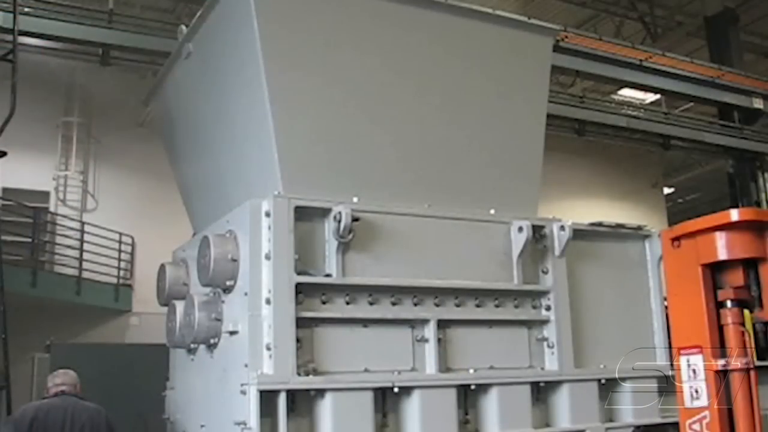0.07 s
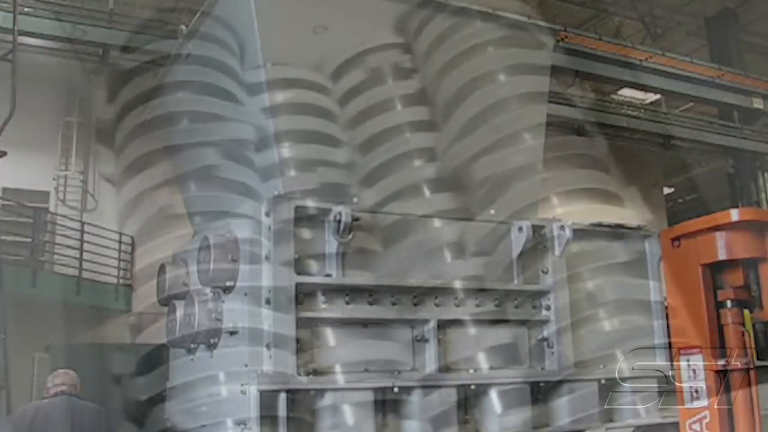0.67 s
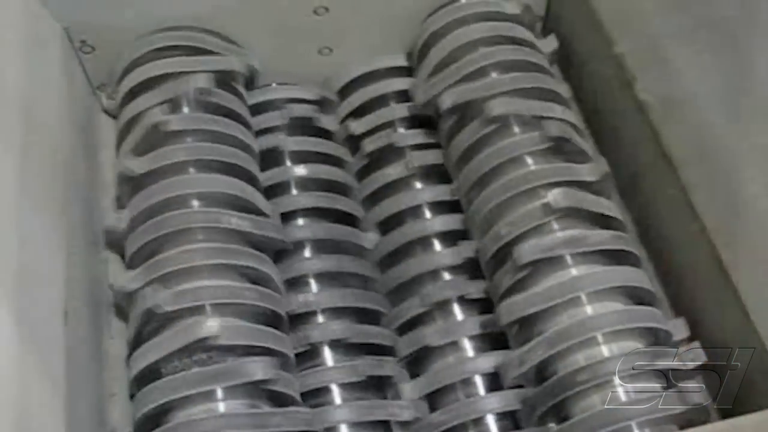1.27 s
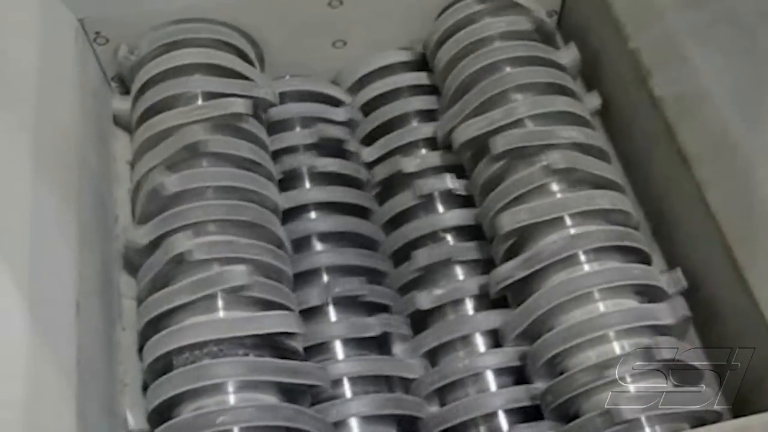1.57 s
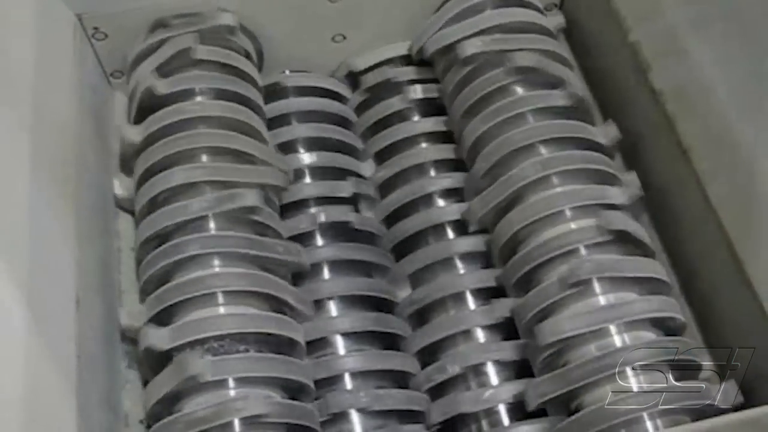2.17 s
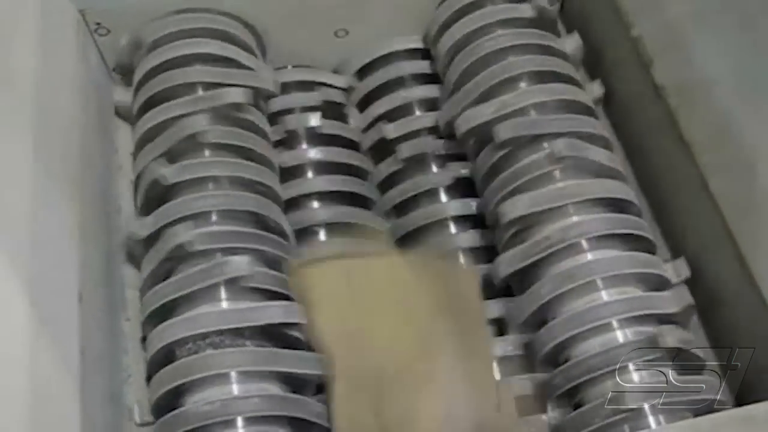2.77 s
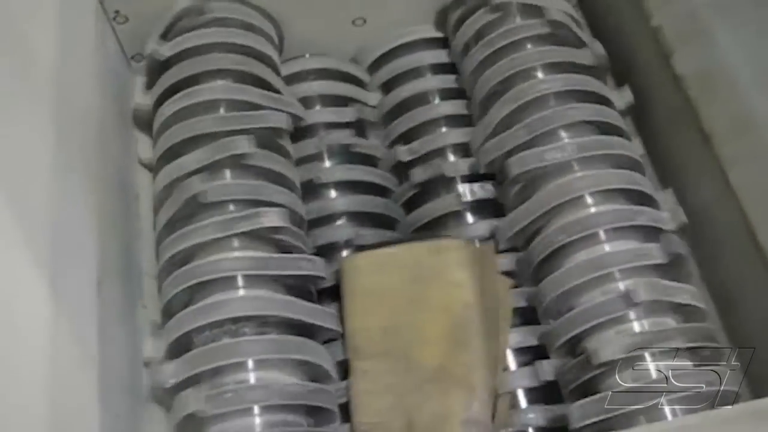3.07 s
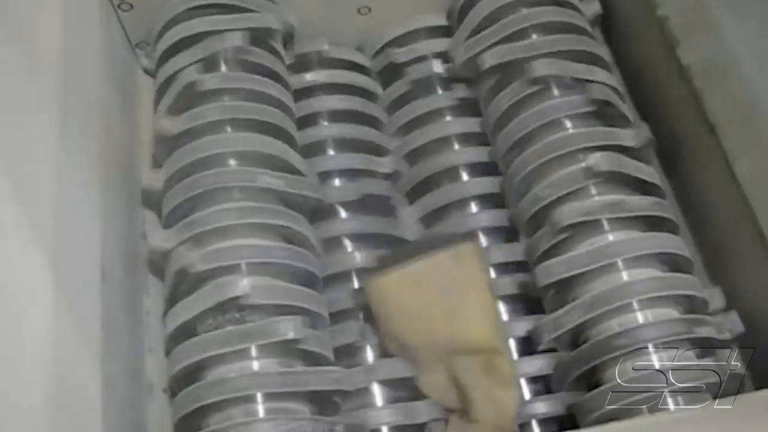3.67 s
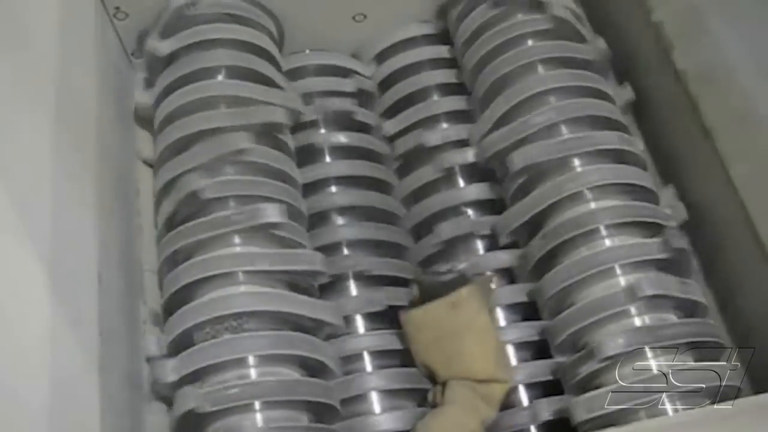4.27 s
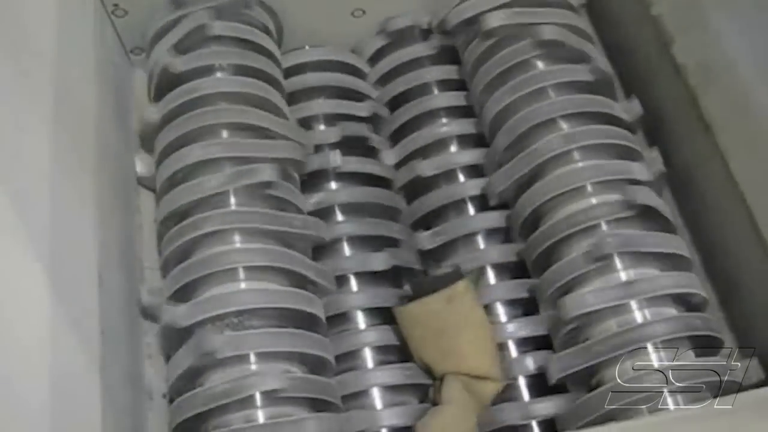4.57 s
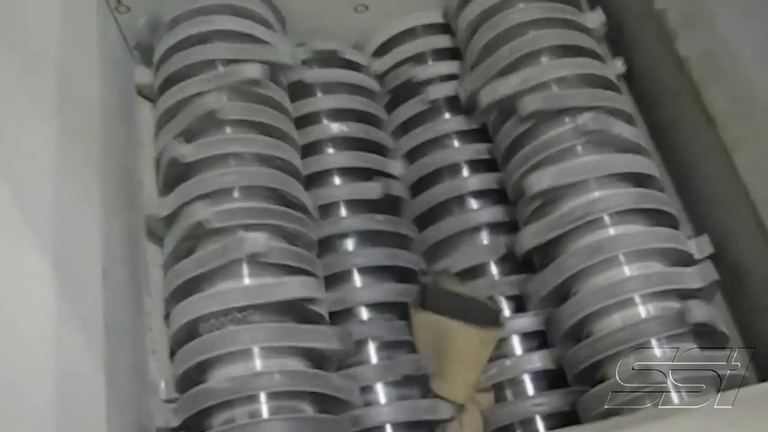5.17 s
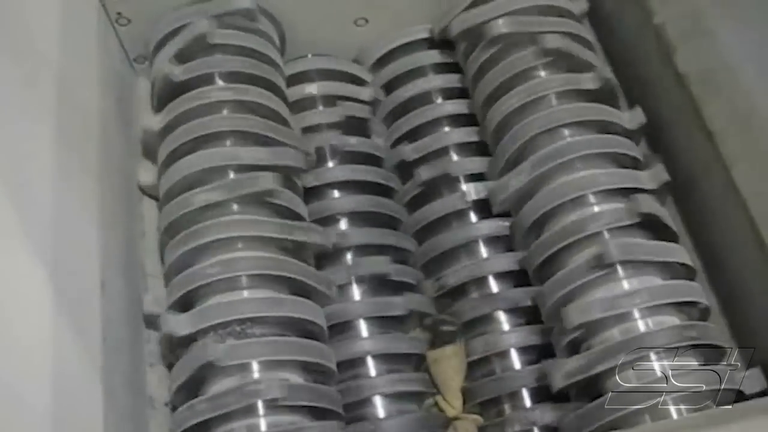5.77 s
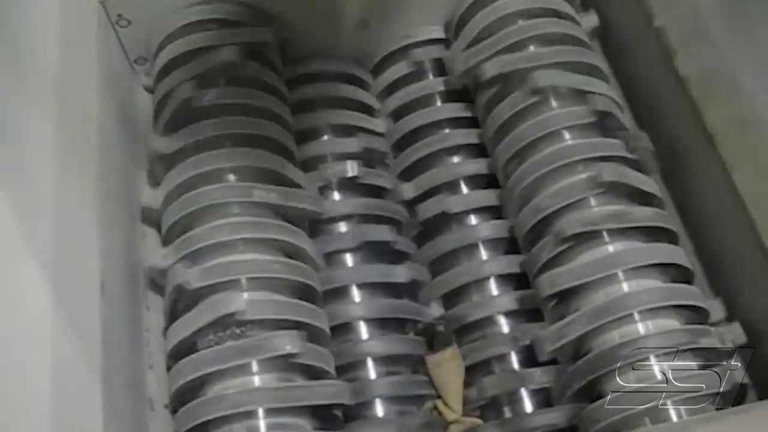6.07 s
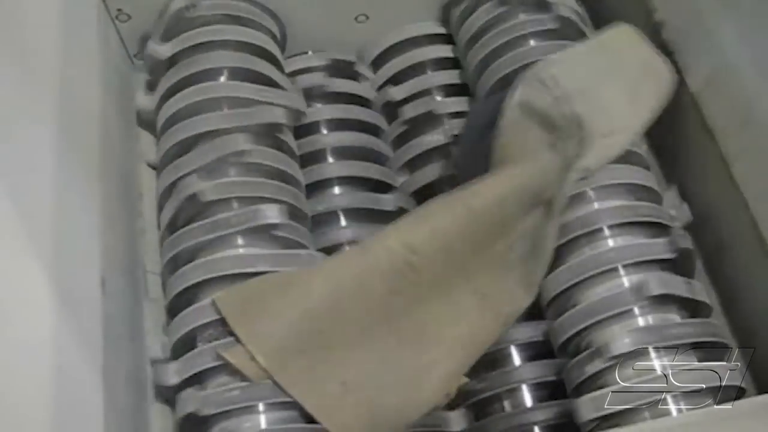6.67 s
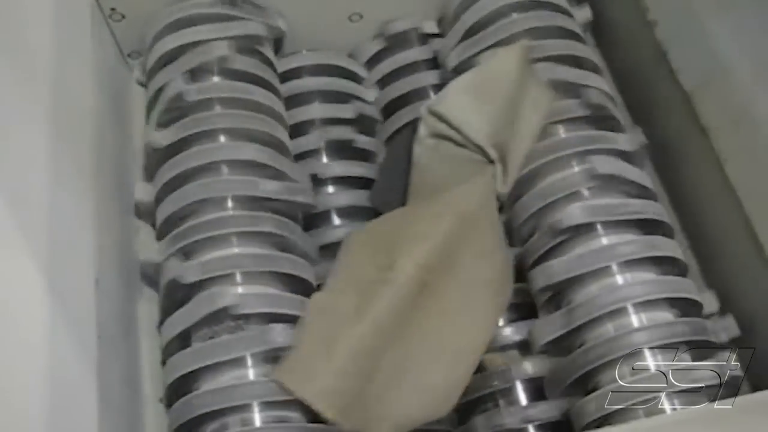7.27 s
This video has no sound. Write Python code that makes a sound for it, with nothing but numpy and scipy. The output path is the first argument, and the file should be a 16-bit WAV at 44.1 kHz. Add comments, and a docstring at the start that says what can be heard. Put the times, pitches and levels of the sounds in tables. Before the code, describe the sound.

After a brief silence, an industrial shredder fades in between about 0.7 and 1.7 seconds, heard from above its steel hopper. Its motors give a throbbing low hum, the gears whine and the cutter shafts rumble and churn throughout. At about 2.8 seconds a piece of carpet lands on the cutters with a heavy thump, the loudest moment, followed by sharp snaps and brief steel squeaks. Around 3.4 seconds there are smaller knocks and the rumble swells as the cutters bite. From then on the carpet tears in irregular crackling bursts, with short rasps and rips. The drive groans briefly several times between 4 and 6 seconds, with another soft knock at 5. The tearing grows denser from about 5 seconds and continues over the machine rumble until the end at around 7.5 seconds, with a sharp rip just before.

```python
"""Four-shaft shredder tearing carpet

Heard from above the steel hopper in a factory hall, fading in. Motors hum and gears whine
over the rumble of the cutter shafts. A piece of carpet thumps in, and the hooks tear it
in crackling bursts while the drives sing under the load."""
import sys
import numpy as np
from scipy import signal
from scipy.fft import rfft, irfft
from scipy.io import wavfile
from scipy.ndimage import uniform_filter1d

SR = 44100
rng = np.random.default_rng(int(sys.argv[2]) if len(sys.argv) > 2 else 0)


def generate_wav(sig):
    """Save sig (samples, or channels by samples) to the path in sys.argv[1] as 16-bit PCM at SR."""
    pcm = np.round(np.clip(np.atleast_2d(sig).T, -1, 1) * 32767).astype(np.int16)
    wavfile.write(sys.argv[1], SR, pcm)


N = 331632
T, HZ = np.arange(N) / SR, np.fft.rfftfreq(N, 1 / SR)
MOTOR_HZ, MESH_HZ = 30.14, 211.2
BITE_S, GRIP_S = 3.16, 0.56


def gain_of(db):
    """Decibels to amplitude."""
    return 10 ** (np.asarray(db) / 20)


def unit_rms(x):
    """Scales to rms 1."""
    return x / np.sqrt(np.mean(x ** 2) + 1e-20)


def at_hz(table, hz):
    """Interpolates a table over log frequency."""
    table_hz, value = np.transpose(table)
    return np.interp(np.log(hz + 1), np.log(table_hz + 1), value)


def drift(rate_hz, size=4096):
    """Low-passed random wander, rms about 1."""
    t = np.linspace(0, T[-1], size)
    rolloff = 1 + (np.fft.rfftfreq(size, t[1]) / rate_hz) ** 4
    slow = irfft(rfft(rng.standard_normal(size)) / rolloff)
    return np.interp(T, t, unit_rms(slow))


def burst(peak_s, db, length_s):
    """Bell envelope that falls faster than it rises."""
    width_s = length_s * np.where(T < peak_s, 1.2, .75)
    return gain_of(db) * np.exp(-2 * ((T - peak_s) / width_s) ** 2)


def loaded(idle, load):
    """Idle-to-load ramp as the hooks grip, centred on the bite."""
    return idle + (load - idle) * np.clip((T - BITE_S) / GRIP_S + .5, 0, 1)


# Shaft labour: (time [s], effort [dB])
SHAFT_EFFORT = [(1.6, -2), (2.1, 1.5), (2.75, .5), (2.9, 2), (3.05, 0), (3.28, -.5), (3.4, 5), (3.62, 1),
                (4.3, 0.5), (4.5, -1.5), (5.0, .5), (5.2, -1), (5.72, -2.5), (6.0, 0), (6.14, -0.5),
                (6.62, -2), (7.0, 0.5), (7.5, -.5)]


def effort_db():
    """How hard the shafts labour at each sample."""
    return np.interp(T, *np.transpose(SHAFT_EFFORT))


# Likeness of the ears: (frequency [Hz], correlation [0-1])
EAR_CORRELATION = [(60, 0.99), (250, .99), (500, 0.96), (1000, 0.86), (2000, 0.65), (4000, 0.077),
                   (8000, 0.11), (14000, 0.18)]


def coloured(pair, spectrum, band_hz):
    """Shapes and correlates two noises; their mean has rms 1 within the band."""
    left, other = rfft(pair) * gain_of(at_hz(spectrum, HZ))
    likeness = at_hz(EAR_CORRELATION, HZ)
    ears = np.array([left, likeness * left + np.sqrt(1 - likeness ** 2) * other])
    in_band = (HZ > band_hz[0]) * (HZ < band_hz[1])
    return irfft(ears, N) / np.std(irfft(ears.mean(0) * in_band, N))


def tone(hz, db, flutter, flutter_hz):
    """Machine tone fluttering in level and phase; high tones differ in phase between the ears."""
    carrier = np.exp(2j * np.pi * (np.cumsum(hz * np.ones(N)) / SR + rng.random()))
    wobble = 1 + flutter * (drift(flutter_hz) + 1j * drift(flutter_hz))
    line = carrier * wobble / np.sqrt(.5 + flutter ** 2)
    spread_rad = np.arccos(at_hz(EAR_CORRELATION, np.mean(hz))) * rng.choice([-.5, .5])
    return gain_of(db) * np.array([line * np.exp(1j * spread_rad), line * np.exp(-1j * spread_rad)]).real


# Motor and gearbox hum: (frequency [Hz], level [dB])
HUM_LINES = [(30.6, -44.5), (55.2, -42), (60.3, -36), (62.6, -33.5), (75.4, -27), (105.6, -29),
             (120.9, -36), (150.7, -42), (180, -37.5), (185.7, -43.5), (226.8, -37), (231, -36)]


def motors():
    """Close low lines beat and make the machine throb."""
    swell = gain_of(0.77 * effort_db() + loaded(0.7, -1.5))
    return swell * sum(tone(hz, db, flutter=0.061, flutter_hz=2.0) for hz, db in HUM_LINES)


# Tooth mesh: (harmonic [n], idle level [dB], load level [dB])
MESH_HARMONICS = [(1, -29.5, -27.5), (2, -31, -37), (3, -38, -42), (4, -33, -39.5), (5, -35.5, -37.5),
                  (6, -44, -50), (7, -38, -44), (9, -43, -43), (10, -36.5, -38)]
# Other gears and bearings: (frequency [Hz], idle level [dB], load level [dB])
BEARING_WHINES = [(513.7, -41, -37.5), (721, -34, -44), (913, -48, -42.5), (1035, -36, -38.5),
                  (1552, -37.5, -40), (1659, -41, -44.5), (1673, -45, -43), (2087, -39.5, -40.5),
                  (2584, -49, -47), (3124, -37.5, -41), (5500, -49, -56)]


def gears():
    """Meshing teeth sound harmonics and jolt as they take up the bite; bearings whine."""
    mesh_hz = MESH_HZ * (1 + 0.0007 * drift(1.13))
    jolt = burst(peak_s=3.7, db=-21, length_s=0.072)
    out = jolt * tone(mesh_hz, 0, flutter=0.085, flutter_hz=11)
    for order, idle_db, load_db in MESH_HARMONICS:
        out += tone(order * mesh_hz, loaded(idle_db, load_db), 0.19 * np.sqrt(order), flutter_hz=5.3)
    for hz, idle_db, load_db in BEARING_WHINES:
        whine_hz = hz * (1 + 0.000897 * drift(1.54))
        whine_db = loaded(idle_db, load_db) + 1.2 * drift(2.9)
        out += tone(whine_hz, whine_db, flutter=0.51, flutter_hz=9)
    return out


# Shaft rumble: (frequency [Hz], density [dB])
RUMBLE_SPECTRUM = [(15, -26), (27, -15), (36, -5), (80, 2), (130, -1), (200, 2.5), (300, 0.5), (460, 1),
                   (600, -2.5), (720, -5.5), (1000, -12.5), (1600, -19.5), (4000, -53)]
# Disc churn: (frequency [Hz], density [dB])
CHURN_SPECTRUM = [(300, -15), (700, -1.5), (1100, 0), (1900, -0.5), (2400, -3), (2900, -3.5), (3500, -7),
                  (4600, -11.5), (6000, -10), (7200, -12), (10000, -17.5), (12000, -21), (15000, -41)]


def cutters(rumble_db=-23, churn_db=-26, muffle_db=-0.7):
    """Shafts rumble, pulsing twice and four times a motor turn; discs churn, deadened by carpet."""
    turn_rad = 2 * np.pi * MOTOR_HZ * T
    pulsing = 1 + 0.19 * np.cos(2 * turn_rad) + 0.14 * np.cos(4 * turn_rad)
    rumble = rng.standard_normal((2, N)) * pulsing * gain_of(drift(41))
    churn = rng.standard_normal((2, N)) * gain_of(0.66 * drift(30))
    rumble = coloured(rumble, RUMBLE_SPECTRUM, band_hz=(230, 700))
    churn = coloured(churn, CHURN_SPECTRUM, band_hz=(950, 2200))
    rumble *= gain_of(rumble_db + effort_db())
    churn *= gain_of(churn_db + 0.58 * effort_db() + loaded(0, muffle_db))
    return rumble + churn


# Thick folds going through: (time [s], level [dB], length [s])
FOLD_GROANS = [(3.883, -27.5, 0.12), (4.055, -28, 0.039), (4.29, -22, .18), (5.003, -29, 0.15),
               (5.253, -29, 0.14), (5.574, -27.5, 0.058), (5.785, -26.5, 0.087), (6.135, -41, 0.049),
               (7.2, -35, 0.38)]


def drive():
    """Two motor orders sing: the high one groans at each fold, the low one follows the effort."""
    motor_hz = MOTOR_HZ * (1 + 0.00199 * drift(1.64))
    sing = gain_of(loaded(-38.5, -34) + 1.6 * drift(12))
    groans = sum(burst(*row) for row in FOLD_GROANS)
    high = (sing + groans) * tone(19 * motor_hz, 0, flutter=0.26, flutter_hz=13)
    low_db = loaded(-33.5, -31) + 2 * effort_db()
    return high + tone(11 * motor_hz, low_db, flutter=0.16, flutter_hz=16)


# Steel on steel: (time [s], level [dB], length [s], pitch [Hz])
DISC_SQUEAKS = [(2.732, -28, 0.07, 1900), (3.17, -28.5, 0.51, 1058), (3.063, -30, 0.089, 2105),
                (3.195, -35, .08, 3128), (4.4, -32.5, 0.27, 914), (5.248, -33, 0.77, 909),
                (6.58, -36, .08, 1900)]


def squeaks():
    """A disc briefly brushes its neighbour."""
    return sum(burst(time_s, db, length_s) * tone(hz, 0, flutter=0.18, flutter_hz=25)
               for time_s, db, length_s, hz in DISC_SQUEAKS)


def fibres(per_s, spread_db, clump_db):
    """Tiny snaps in clumps, each a noise puff with a short tail from the hopper walls."""
    size = gain_of(spread_db * np.minimum(rng.exponential(1, N), 4) + clump_db * drift(64))
    snaps = size ** 2 * (rng.random(N) < per_s / SR)
    t = T[:SR // 10]
    decay = np.exp(-t / 0.00029) + 0.017 * np.exp(-t / 0.011)
    power = signal.fftconvolve(snaps, decay)[:N]
    return rng.standard_normal((2, N)) * np.sqrt(abs(power))


# Carpet between the discs: (time [s], level [dB], length [s], centre [Hz])
RASP_STROKES = [(2.818, -25, .022, 2120), (3.412, -24.5, .04, 2390), (4.766, -25, 0.032, 2270),
                (5.005, -22.5, 0.028, 2200), (5.39, -26, .07, 2550), (5.46, -23, 0.03, 2600),
                (5.61, -23.5, 0.02, 2640), (5.734, -22, 0.029, 2500), (5.788, -24, 0.032, 2420),
                (6.304, -25.5, .04, 1940), (6.773, -27, .014, 3700), (6.825, -26.5, .022, 3600),
                (7.071, -24.5, 0.023, 2500), (7.28, -29, .025, 2390)]


def rasps(half_width_oct=0.25, crossfeed=0.64):
    """The backing sticks and slips on steel, each stroke in its own band."""
    slips = rfft(fibres(per_s=1100, spread_db=1.0, clump_db=2.8))
    out = np.zeros((2, N))
    for time_s, db, length_s, hz in RASP_STROKES:
        band = 1 / (1 + (np.log2((HZ + 1) / hz) / half_width_oct) ** 2)
        out += burst(time_s, db, length_s) * unit_rms(irfft(slips * band, N))
    return gain_of(-1) * (out + crossfeed * out[::-1])


# Carpet hitting the cutters: (time [s], level [dB])
CARPET_BLOWS = [(2.803, -7), (2.827, 1.5), (2.8318, -7), (2.8418, -7), (3.375, -10), (3.397, -10),
                (3.436, -8), (5.005, -7.5)]
# Cutter box modes: (frequency [Hz], level [dB], T60 [s])
BOX_MODES = [(111, -16, 0.13), (198, -18, .1), (293, -7, .08), (365, -7, 0.061), (420, 1, 0.058),
             (494, -5, 0.1), (967, -10, 0.041), (1990, -22, .04)]
# Cloth slap: (frequency [Hz], density [dB])
SLAP_SPECTRUM = [(40, -3), (200, 4), (500, 2), (1000, -9), (1800, -5.5), (3200, -10), (6000, -46)]


def thumps(attack_s=0.0024):
    """Heavy carpet slaps the cutters; the box rings briefly, damped by the cloth."""
    t = T[:SR // 3]
    ring = sum(gain_of(db - 60 * t / t60_s) * np.sin(2 * np.pi * hz * t) for hz, db, t60_s in BOX_MODES)
    ring *= 1 - np.exp(-t / attack_s)
    blows = np.zeros(N)
    for time_s, db in CARPET_BLOWS:
        blows[round(time_s * SR)] += gain_of(db)
    cloth = coloured(rng.standard_normal((2, N)), SLAP_SPECTRUM, band_hz=(200, 2000))
    slap = burst(peak_s=2.829, db=-12, length_s=0.031) * cloth
    return signal.fftconvolve(blows, ring)[:N] + slap


def tear(start_s, length_s, db, rise_s=.004, release_s=0.027):
    """Tension builds over half the hook's pull, holds, then lets go."""
    build = np.clip((T - start_s) / (rise_s + .5 * length_s), 0, 1)
    release = np.exp(-np.maximum(T - start_s - length_s, 0) / release_s)
    return gain_of(db) * build * release


# Hooks pulling through: (start [s], length [s], level [dB])
HOOK_TEARS = [(3.365, 0.066, -26.5), (3.6, 0.054, -26), (3.652, 0.048, -27), (3.828, 0.058, -26),
              (3.904, 0.057, -25), (4.03, .1, -32), (4.146, .027, -23), (4.188, 0.034, -30),
              (4.26, 0.092, -27.5), (4.336, .11, -29), (4.68, 0.13, -28), (4.823, .11, -31),
              (4.92, 0.098, -24.5), (5.013, 0.17, -23.5), (5.2, .06, -28), (5.288, 0.056, -24.5),
              (5.35, 0.15, -27), (5.508, 0.16, -23.5), (5.66, .125, -25), (5.8, .05, -29),
              (5.931, 0.011, -27), (6.09, .17, -22.5), (6.25, 0.08, -26.5), (6.308, .11, -22.5),
              (6.446, .065, -25.5), (6.52, .055, -26.5), (6.665, 0.048, -24.5), (6.74, 0.089, -23),
              (6.978, 0.11, -25), (7.137, .15, -28.5), (7.33, 0.1, -28), (7.45, 0.049, -28)]
# Scuffs and slaps as the carpet lands, then sharp rips of the backing:
# (time [s], level [dB], length [s], brightness [0-1])
SCUFFS_AND_RIPS = [(2.715, -31, 0.18, 0), (2.813, -19, 0.016, 0.2), (2.835, -20.5, 0.017, .7),
                   (2.968, -20, 0.027, 1), (2.992, -16, 0.012, 0.9), (3.637, -22, .02, .7),
                   (3.87, -29, .03, .5), (4.115, -22.5, 0.018, .5), (4.344, -24, .012, .8),
                   (5.003, -26, .018, .3), (6.24, -28, .025, .9), (6.55, -24, 0.019, 0.2),
                   (6.714, -23.5, 0.015, 0), (6.783, -27, 0.014, 0.2), (6.816, -24, 0.02, 0.7),
                   (6.845, -22, .011, .4), (7.281, -23, .018, 0.8), (7.394, -18, 0.018, 1)]
# Tearing fibres: (frequency [Hz], density [dB])
TEAR_SPECTRUM = [(500, -20), (1500, 0.5), (2900, 6.5), (4600, -1.5), (5700, 5), (7000, 3.5), (9600, -0.5),
                 (12000, -5.5), (14000, -15), (15500, -32)]
# Bright snaps: (frequency [Hz], density [dB])
SNAP_SPECTRUM = [(1500, -2), (4600, -8), (6000, -1.5), (10000, -3), (12500, -10), (15500, -26)]


def carpet(slide_db=-37.5, treble_hz=(5000, 13000)):
    """Carpet scuffs as it lands, then tears and rips on the hooks, rubbing the discs in between."""
    slide_power = gain_of(slide_db) ** 2 * loaded(0, 0.95)
    pull = np.sqrt(sum(tear(*row) ** 2 for row in HOOK_TEARS) + slide_power)
    dull, sharp = np.zeros((2, N))
    for time_s, db, length_s, brightness in SCUFFS_AND_RIPS:
        envelope = burst(time_s, db, length_s)
        dull += envelope * np.sqrt(1 - brightness)
        sharp += envelope * np.sqrt(brightness)
    tearing = coloured(fibres(per_s=2600, spread_db=3.0, clump_db=0.95), TEAR_SPECTRUM, treble_hz)
    snapping = coloured(fibres(per_s=6600, spread_db=2.0, clump_db=-2.0), SNAP_SPECTRUM, treble_hz)
    return gain_of(-3) * np.hypot(pull, dull) * tearing + gain_of(-4) * sharp * snapping


# Hopper reflections: (delay [s], level [dB])
WALL_ECHOES = [(.0031, -17), (.0053, -17), (.0089, -19)]


def hopper(x, corner_hz=1000):
    """Steel walls throw back the treble and give the hiss a boxy colour."""
    echoes = sum(gain_of(db) * np.exp(-2j * np.pi * HZ * delay_s) for delay_s, db in WALL_ECHOES)
    comb = abs(1 + echoes * HZ / (HZ + corner_hz))
    return irfft(rfft(x) * unit_rms(comb), N)


# Stereo balance: (frequency [Hz], left minus right [dB])
EAR_BALANCE = [(60, -1.5), (1100, -1.3), (1800, -3), (3000, -3.5), (4500, -1.2), (6400, -2), (8000, 2.5),
               (9800, 6), (12000, -4), (15000, 2)]


def scene():
    """All sources, each band a little stronger on one side."""
    mix = motors() + gears() + drive() + squeaks() + thumps() + hopper(cutters() + carpet() + rasps())
    balance = gain_of(np.outer([.5, -.5], at_hz(EAR_BALANCE, HZ)))
    return irfft(rfft(mix) * balance, N)


def record(dry):
    """Gain control ducks after the thump, peaks round off; then fade-in and low-pass."""
    threshold_db, recovery_db_per_s, smooth_s = -14.5, 45, 0.023
    ceiling, fade_in_s, cutoff_hz = .9, (.72, 1.664), 15400
    power_db = 10 * np.log10(abs(uniform_filter1d((dry ** 2).mean(0), 500)) + 1e-12)
    recovery_db = recovery_db_per_s * T
    held_db = np.maximum.accumulate(power_db + recovery_db) - recovery_db
    over_db = np.maximum(held_db - threshold_db, 0)
    pole = np.exp(-1 / (smooth_s * SR))
    ducked = dry / gain_of(0.64 * signal.lfilter([1 - pole], [1, -pole], over_db))
    rounded = ducked / (1 + (ducked / ceiling) ** 6) ** (1 / 6)
    faded = rounded * np.interp(T, fade_in_s, [0, 1])
    lowpass = signal.firwin(511, cutoff_hz, window=("kaiser", 9), fs=SR)
    return signal.oaconvolve(faded, lowpass[None], "same")


dry = scene()
out = record(dry)
generate_wav(out)
```